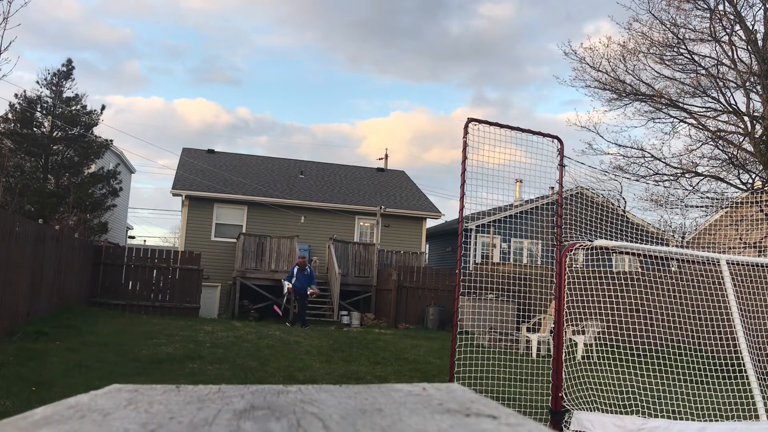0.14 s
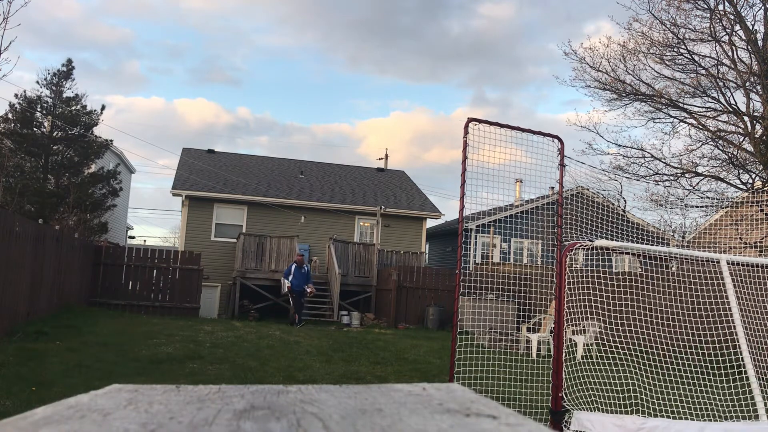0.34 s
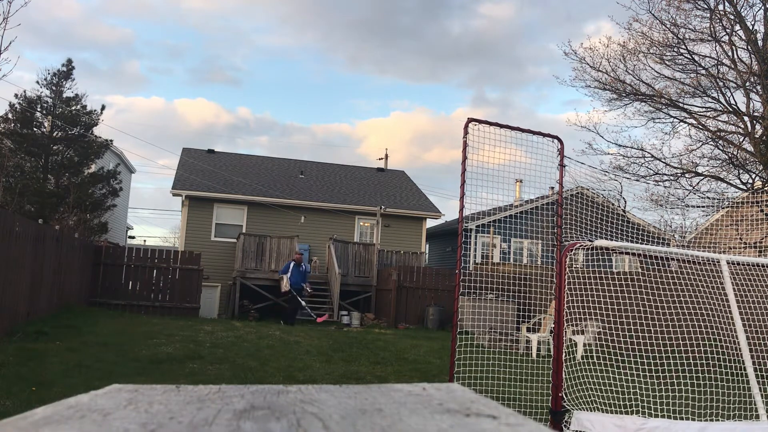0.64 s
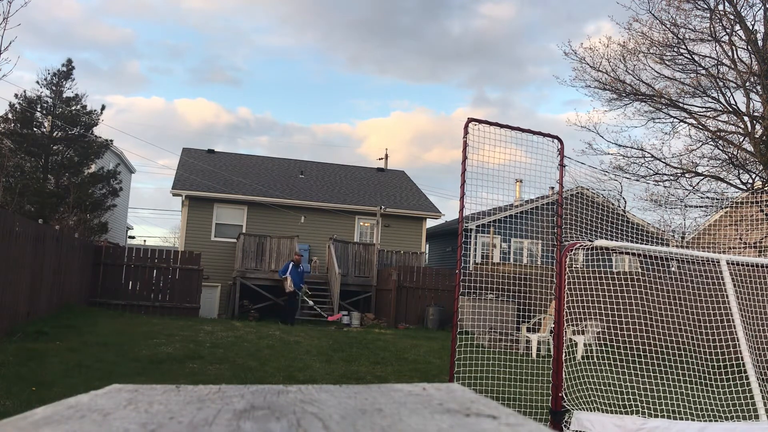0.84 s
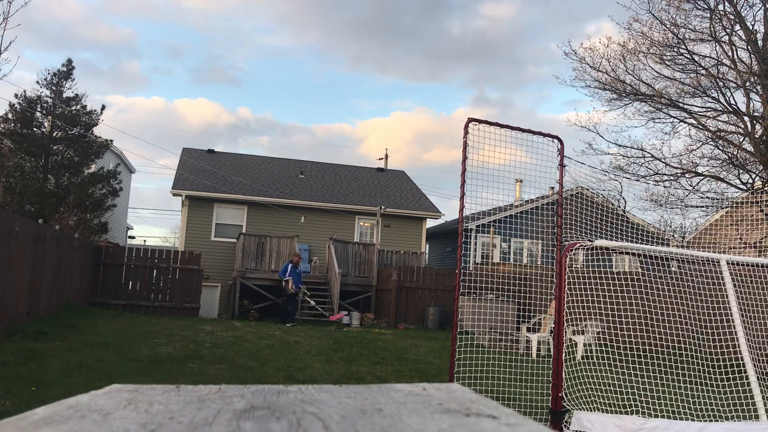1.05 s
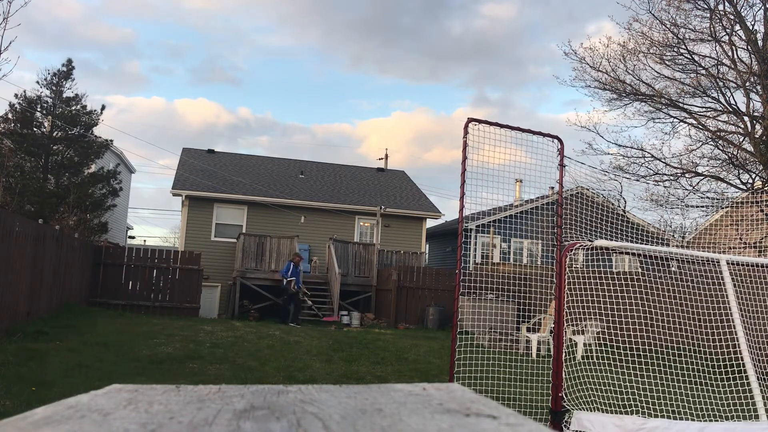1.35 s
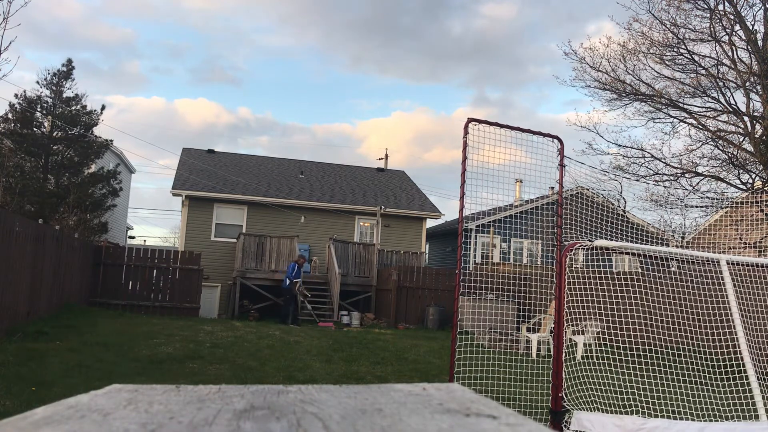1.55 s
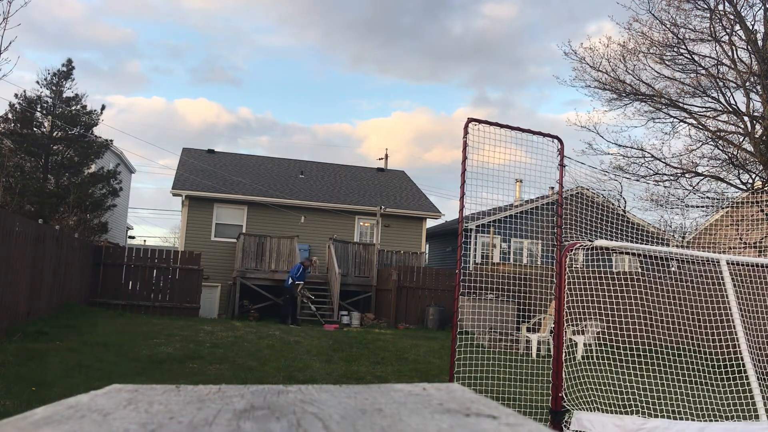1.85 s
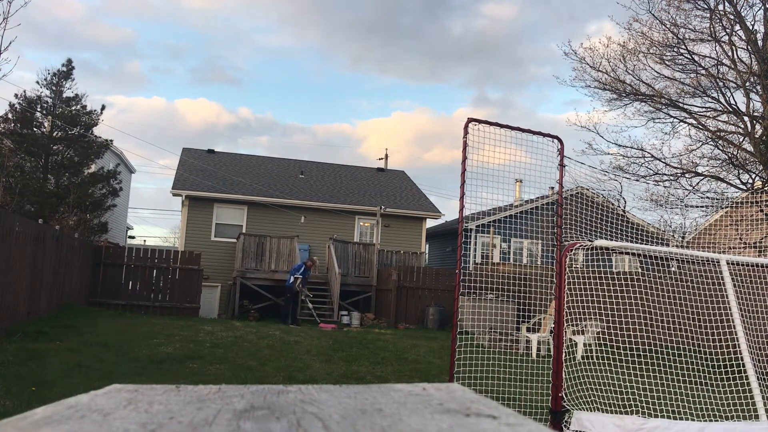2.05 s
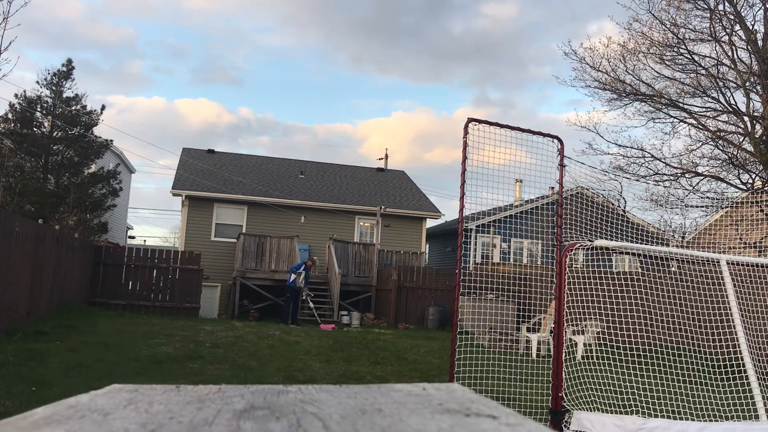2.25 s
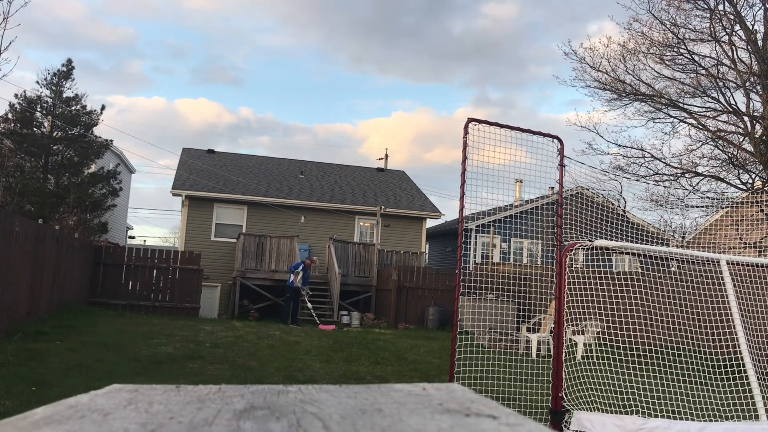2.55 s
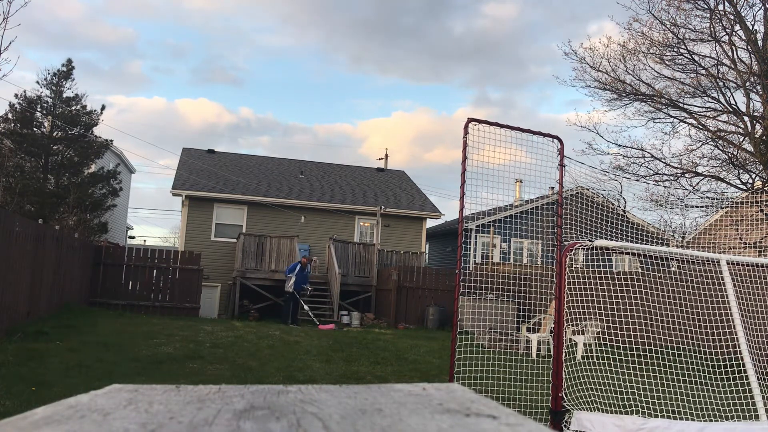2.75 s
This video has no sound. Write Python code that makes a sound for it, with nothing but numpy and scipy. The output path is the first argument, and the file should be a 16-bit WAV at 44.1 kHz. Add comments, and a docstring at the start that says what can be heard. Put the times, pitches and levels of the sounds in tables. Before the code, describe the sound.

A puck hits a hockey net close to the microphone with a hard clack, thump and brief metallic rattle; later a distant stick shot cracks and softer taps follow, echoing off backyard fences over a low hum.

```python
"""A backyard hockey drill. A puck flies into the net close by and clacks on the steel frame; later, far off,
a stick taps pucks on a plastic pad. A motor hums low, stronger than the soft noise of the air, and fences and
walls echo the hits.
Clacks, knocks and the net's push are quickly dying sine waves; whipping cords, scuffs and the long noisy tails
of hits are grainy noise. The frame is a set of ringing, beating pairs of tones. Ticks, slide and air are filtered
noise; the hum is made of wavering low tones. The echo is scattered noise that dies away band by band."""
import sys
import numpy as np
from scipy import signal
from scipy.fft import rfft, irfft
from scipy.io import wavfile

SR = 44100
rng = np.random.default_rng(int(sys.argv[2]) if len(sys.argv) > 2 else 0)


def volts_from_decibels(level):
    """Turn decibel levels (scalar or array-like) into linear amplitude factors."""
    exponent = np.asarray(level, float) / 20
    return 10 ** exponent


def master(y):
    """Save y as 16-bit WAV."""
    cut = np.clip(np.atleast_2d(y).T, -1, 1)
    pcm = np.round(cut * 32767)  # scale
    wavfile.write(sys.argv[1], SR, pcm.astype(np.int16))


N = 127890  # length in samples, 2.9 s


def rms_one(x):
    """Scale a sound so that its average strength (rms) is 1."""
    return x / np.sqrt(np.mean(x ** 2) + 1e-20)


def band(x, low_hz, high_hz):
    """Keep what lies between two pitches, with a Butterworth filter; the upper edge stops near 20 kHz."""
    sos = signal.butter(3, [low_hz, min(high_hz, SR / 2.2)], "band", fs=SR, output="sos")
    return signal.sosfilt(sos, x)


def dying(t60, size):
    """A level curve that falls by 60 dB in t60 seconds."""
    return volts_from_decibels(-60 * np.arange(size) / (t60 * SR))


def add(out, start_s, x):
    """Mix x into out from the given time on."""
    i = int(start_s * SR)
    out[i:i + len(x)] += x[:len(out) - i]


def drift(rate_hz):
    """A randomly wandering curve with rms 1: noise smoothed so that little faster than rate_hz remains."""
    r = np.exp(-2 * np.pi * rate_hz / SR)
    noise = rng.standard_normal(N + SR)
    smooth = signal.lfilter([1], [1, -2 * r, r * r], noise)
    return rms_one(smooth[SR:])  # the first second only settles the filter


def blows(rows, rise_cycles, rough):
    """Each blow is one quickly damped resonance with a short rise; its phase jitters, which widens its pitch."""
    out = np.zeros(N)
    t = np.arange(SR // 5) / SR
    for start_s, peak_db, hz, t60 in rows:
        jitter = rough * np.cumsum(rng.standard_normal(len(t))) * np.sqrt(hz / SR)
        rise = (1 - np.exp(-t * hz / rise_cycles)) ** 2
        x = np.sin(2 * np.pi * hz * t + jitter) * dying(t60, len(t)) * rise
        # a low-pass above the pitch softens the jitter's hiss
        soften = signal.butter(2, min(hz * 1.77, SR / 2.2), fs=SR, output="sos")
        x = signal.sosfilt(soften, x)
        add(out, start_s, volts_from_decibels(peak_db) * x / np.abs(x).max())
    return out


def clacks():
    """Hard clacks of puck and stick: bright resonances that die within milliseconds."""
    # one row per clack: start t/s, peak level/dB, pitch f/Hz, time to fall 60 dB t/s
    clack_rows = [(.2272, -51, 6630, 0.0022), (.2486, -53, 3550, .005), (.2608, -43, 3000, 0.0046),
                  (.2672, -30.5, 2940, 0.0057), (.2674, -31, 3850, 0.013), (.2665, -36, 7100, 0.0029),
                  (.2768, -30, 2770, .01), (.2770, -32.5, 3710, 0.0066), (.2768, -26.5, 6060, 0.003),
                  (.2895, -42, 6800, 0.0092), (.2897, -35, 3370, 0.0057), (.3015, -37, 4200, 0.019),
                  (.3062, -38, 2550, 0.012), (.3155, -37, 3830, 0.016), (.3488, -34.5, 3020, .004),
                  (.3742, -38, 4100, 0.0048), (.3985, -43, 2060, .004), (1.6856, -35, 1780, 0.0013),
                  (1.6856, -36.5, 3900, 0.0022), (1.6895, -57, 5470, 0.0041), (1.6985, -27, 4910, 0.0077),
                  (1.699, -61, 8000, 0.0046), (1.7105, -38, 5070, 0.0032), (1.9855, -53, 2250, 0.0077),
                  (1.9925, -50.5, 2810, 0.011), (2.0265, -58, 2400, .006), (2.0394, -65, 2510, .007),
                  (2.1131, -61.5, 2350, .007), (2.1786, -53, 1960, 0.0059), (2.1925, -62, 4580, 0.0063),
                  (2.205, -54, 2140, 0.0064), (2.282, -68, 4960, .01), (2.296, -65, 4900, .01),
                  (2.3345, -57.5, 2540, 0.0042), (2.3345, -63, 4850, .012), (2.3478, -70, 4400, 0.005),
                  (2.396, -69, 3000, .005), (2.5896, -72, 1700, 0.0047)]
    return blows(clack_rows, rise_cycles=1.35, rough=0.49)


def knocks():
    """Dull knocks: lower resonances that start almost at once."""
    # one row per knock: start t/s, peak level/dB, pitch f/Hz, time to fall 60 dB t/s
    knock_rows = [(.249, -35, 1016, 0.029), (.261, -39, 685, .02), (.268, -33.5, 700, 0.011),
                  (.2775, -26.5, 745, 0.02), (.276, -29.5, 198, 0.028), (.300, -52, 790, .03),
                  (.308, -37.5, 292, 0.034), (.324, -39, 646, 0.023), (.349, -38.5, 560, 0.012),
                  (.3993, -32, 630, 0.0056), (.406, -40, 293, 0.014), (.415, -38.5, 167, 0.027),
                  (.79, -49, 230, 0.02), (1.6855, -34, 320, 0.034), (1.688, -38.5, 194, 0.042),
                  (1.6995, -36.5, 946, 0.021), (1.700, -32.5, 306, 0.0085), (1.7105, -34.5, 826, 0.0067),
                  (1.855, -44, 288, 0.013), (1.9575, -40.5, 272, 0.024), (1.972, -45.5, 256, 0.033),
                  (1.9855, -48.5, 296, 0.084), (2.179, -36, 285, 0.014), (2.282, -40.5, 238, 0.016),
                  (2.335, -37.5, 250, 0.017), (2.396, -47, 350, 0.021), (2.408, -46, 283, 0.014),
                  (2.591, -41, 260, 0.016), (2.603, -42.5, 170, 0.074), (2.622, -50, 170, 0.041),
                  (2.642, -48.5, 166, 0.13)]
    return blows(knock_rows, rise_cycles=0.02, rough=0.65)


def net_push():
    """The net takes the puck: one low, short resonance."""
    # the push: start t/s, peak level/dB, pitch f/Hz, time to fall 60 dB t/s
    push_rows = [(.268, -29, 88, 0.052)]
    return blows(push_rows, rise_cycles=0.45, rough=0.14)


def whips_and_tails():
    """Cords whip in the net, later sticks scuff the pad; some noisy, grainy bursts are the long tails of hits."""
    # one row per burst: start t/s, rms level before it dies away level/dB,
    # low edge f/Hz, high edge f/Hz, time to fall 60 dB t/s
    burst_rows = [(0.227, -46.5, 2310, 15700, 0.074), (0.2277, -51, 2500, 9500, 0.17),
                  (.249, -48, 500, 4550, 0.13), (.262, -41, 293, 4550, 0.34),
                  (0.267, -48, 3000, 14000, 0.025), (0.277, -42, 6000, 14600, 0.013),
                  (0.2969, -41, 8100, 10800, 0.071), (0.2955, -43, 14800, 16500, 0.12),
                  (0.297, -44.5, 3000, 12300, 0.17), (.29, -45, 280, 1200, 0.35),
                  (1.6857, -45.5, 500, 5300, 0.14), (1.70, -57.5, 3300, 6130, 0.59),
                  (1.70, -59, 680, 3000, 1), (.32, -56, 1460, 5000, 0.68), (1.701, -67, 6000, 11900, 0.21),
                  (1.986, -63.5, 1450, 3480, .3), (2.179, -58.5, 404, 3240, 0.32),
                  (2.335, -68, 500, 5270, 0.41), (2.591, -69, 500, 3000, 0.26)]
    grain_db, grain_rate_hz = 3, 200
    out = np.zeros(N)
    grain = volts_from_decibels(grain_db * drift(grain_rate_hz))
    size = SR // 2
    for start_s, db, low_hz, high_hz, t60 in burst_rows:
        noise = rms_one(band(rng.standard_normal(size), low_hz, high_hz))
        add(out, start_s, volts_from_decibels(db) * noise * dying(t60, size))
    return out * rms_one(grain)


def frame():
    """The steel rings: each blow strikes every mode, a beating pair blurred by loose joints, at a chance strength."""
    # ways the steel rings: pitch f/Hz, level relative to the blow level/dB, time to fall 60 dB t/s
    frame_modes = [(2360, -5, .45), (3951, -6, .2), (4425, -6, .2), (5800, -6, .4), (6616, 0, .45),
                   (6750, -2, .3), (7483, -8, .15), (7876, -8, .15), (8600, -3, .08), (9292, -8, .1),
                   (10500, -6, .08), (11610, -9, .1), (12600, -10, .1)]
    # blows on the frame: start t/s, level before the mode's own level and chance level/dB
    frame_hits = [(.297, -54), (.311, -60), (.354, -58), (.394, -63.5)]
    blur_hz, pair_ratio, chance_db = 40, 1.005, 1.5
    out = np.zeros(N)
    t = np.arange(SR // 2) / SR
    for start_s, db in frame_hits:
        for hz, mode_db, t60 in frame_modes:
            chance, phase_a, phase_b = rng.standard_normal(3)
            blur = np.cumsum(rng.standard_normal(len(t))) * np.sqrt(2 * np.pi * blur_hz / SR)
            first = np.sin(2 * np.pi * hz * t + np.pi * phase_a + blur)
            second = 0.94 * np.sin(2 * np.pi * hz * pair_ratio * t + np.pi * phase_b + blur)
            level = volts_from_decibels(db + mode_db + chance_db * chance)
            add(out, start_s, level * (first + second) * dying(t60, len(t)))
    return out


def yard(x):
    """Fences and walls send back scattered echoes: clumpy noise in bands, each dying at its own pace."""
    # one row per band: low edge f/Hz, high edge f/Hz, level before scaling by length level/dB,
    # time to fall 60 dB t/s
    yard_bands = [(155, 483, -4.5, 0.34), (500, 1370, -8, 0.47), (1380, 3500, -12.5, 0.71),
                  (3000, 7800, -16.5, 0.42), (6000, 28000, -14, 0.52)]
    delay_s, clump_db, clump_rate_hz = .008, 3.4, 140
    size = SR // 2 + SR // 4
    clumps = volts_from_decibels(clump_db * drift(clump_rate_hz)[:size])
    echo = np.zeros(size)
    for low_hz, high_hz, db, t60 in yard_bands:
        scatter = band(clumps * rng.standard_normal(size), low_hz, high_hz)
        # longer tails are turned down so that their energy does not grow with length
        add(echo, delay_s, volts_from_decibels(db) * scatter * dying(t60, size) / np.sqrt(t60 * SR / 14))
    return signal.fftconvolve(x, echo)[:N]


def ticks():
    """Faint high ticks nearby: tiny snaps of bright noise."""
    # one row per tick: start t/s, rms level before it dies away level/dB
    tick_rows = [(0.907, -62), (1.2386, -72), (1.3304, -66), (1.8387, -69), (2.1385, -66), (2.3353, -63),
                 (2.7038, -66)]
    low_hz, high_hz, t60, size = 9000, 20000, 0.012, 2000
    out = np.zeros(N)
    for start_s, db in tick_rows:
        noise = rms_one(band(rng.standard_normal(size), low_hz, high_hz))
        add(out, start_s, volts_from_decibels(db) * noise * dying(t60, size))
    return out


def slide():
    """Something slides over the pad: a soft, slightly uneven swell of hiss in the middle pitches."""
    # points of the swell: time t/s, rms level level/dB
    slide_points = [(.6, -99), (.72, -83), (.83, -73.5), (.92, -73), (.99, -86), (1.15, -102)]
    s, db = np.transpose(slide_points)
    swell_db = np.interp(np.arange(N) / SR, s, db, -130, -130)
    level = volts_from_decibels(swell_db + 0.89 * drift(30))
    return level * rms_one(band(rng.standard_normal(N), 1910, 4200))


def hum():
    """The motor: each low line is a steady tone plus narrow noise around it, so it wavers."""
    # one row per line: pitch f/Hz, rms level level/dB, width of the noise f/Hz, steady share of the power (0-1)
    hum_lines = [(35.6, -66.5, 2.2, 1), (72.47, -52, 5.8, 0.84), (59.3, -65, 4.2, 0.5),
                 (118.7, -64.5, 12, 0.1), (145.2, -75, 9.3, 0.3)]
    out = 0
    t = np.arange(N) / SR
    for hz, db, width_hz, steady in hum_lines:
        steady = np.clip(steady, 0, 1)
        wobble = np.sqrt((1 - steady) / 2) * (drift(width_hz) + 1j * drift(width_hz))
        turning = np.exp(2j * np.pi * (hz * t + rng.random()))
        line = np.real((np.sqrt(steady) + wobble) * turning)
        out = out + volts_from_decibels(db) * np.sqrt(2) * line
    return out


def air():
    """Distant traffic, breeze and microphone hiss: noise shaped to a curve, its level drifting slowly."""
    # tone colour of the air: pitch f/Hz, relative level per Hz level/dB
    air_curve = [(12, -36), (25, -25.5), (45, -14.5), (70, -15.5), (100, -14), (160, -19), (250, -27.5),
                 (470, -28.5), (800, -31), (1300, -39), (2300, -44.5), (5000, -49), (8000, -53.5),
                 (12000, -55), (16000, -51)]
    level_db, drift_db, drift_rate_hz = -59.5, 0.8, 3.6
    hz, db = np.transpose(air_curve)
    f = np.arange(N // 2 + 1) * SR / N + 1e-3  # the small offset avoids log(0)
    shape = volts_from_decibels(np.interp(np.log(f), np.log(hz), db))
    noise = irfft(rfft(rng.standard_normal(N)) * shape, N)
    return volts_from_decibels(level_db + drift_db * drift(drift_rate_hz)) * rms_one(noise)


def scene():
    """All sources added into one channel; only the hits are sent to the yard's echo."""
    hits = clacks() - knocks() - net_push() + whips_and_tails() + frame()
    # the net is near, so the echo of the first second is 1 dB weaker
    in_net = np.arange(N) < 1.0 * SR
    sent = hits * np.where(in_net, volts_from_decibels(-1), 1)
    mix = hits + yard(sent) + ticks() + slide() + hum() + air()
    return mix[None]


def low_pass(x):
    """Removes everything above the highest recorded frequency."""
    return signal.sosfilt(signal.butter(12, 16020, fs=SR, output="sos"), x)


def record(dry):
    """A steep low-pass filter cuts off the very top of the treble."""
    top_cut = signal.cheby2(12, 60, 16330, fs=SR, output="sos")  # 60 dB down from 16330 Hz up
    finished = signal.sosfilt(top_cut, dry)
    return low_pass(finished)


dry = scene()
out = record(dry)
master(out)
```